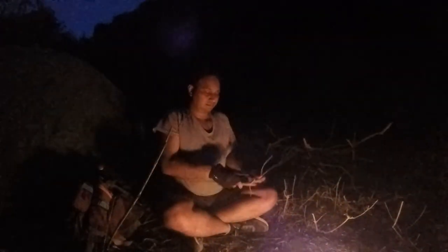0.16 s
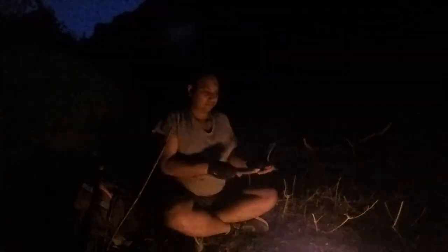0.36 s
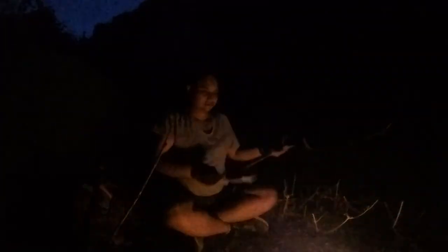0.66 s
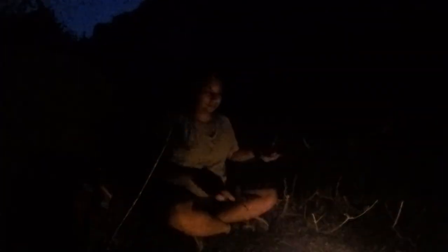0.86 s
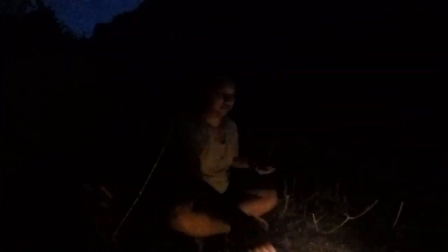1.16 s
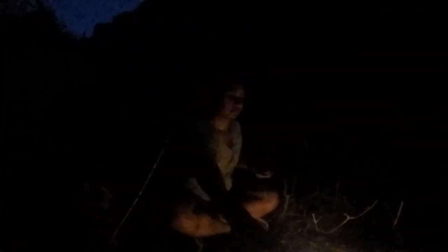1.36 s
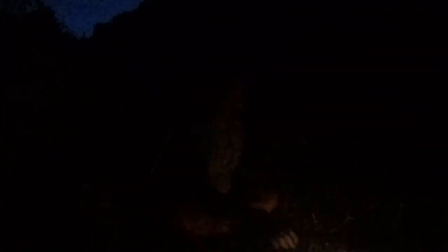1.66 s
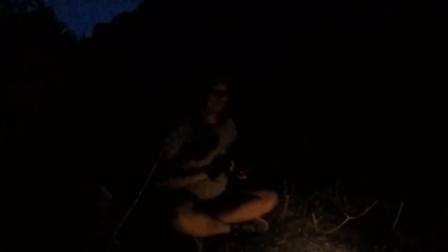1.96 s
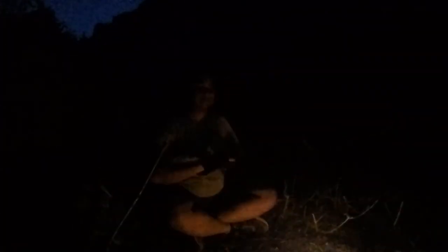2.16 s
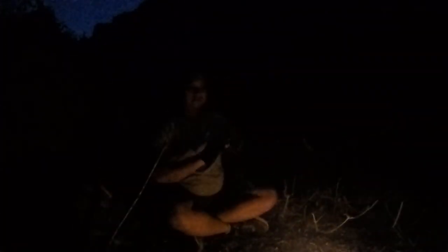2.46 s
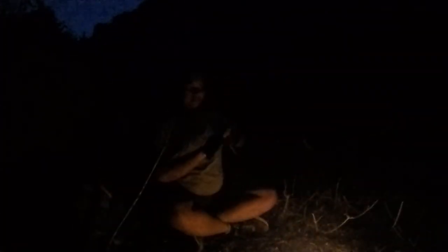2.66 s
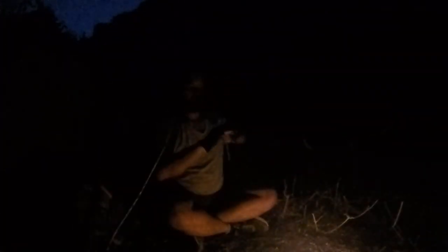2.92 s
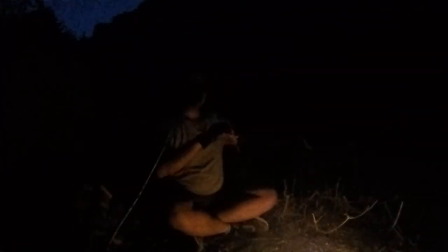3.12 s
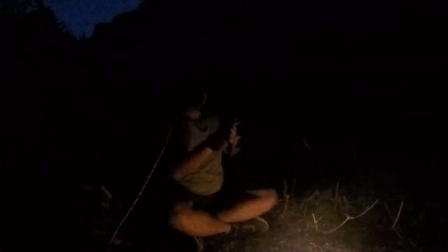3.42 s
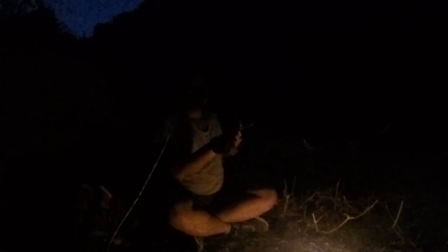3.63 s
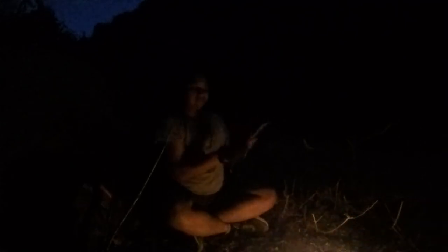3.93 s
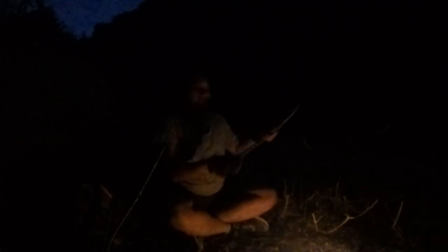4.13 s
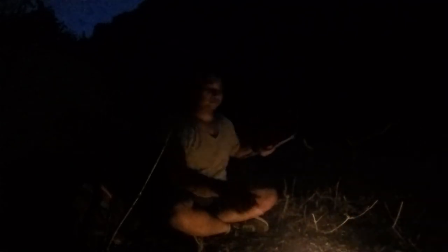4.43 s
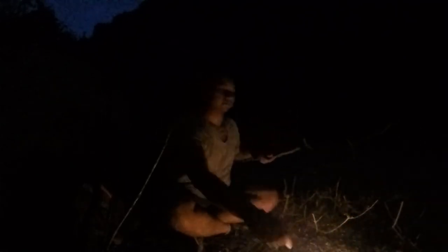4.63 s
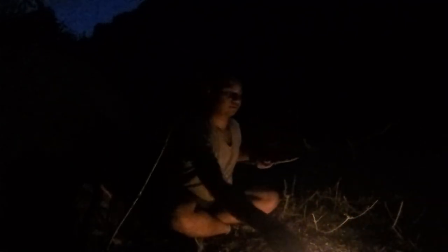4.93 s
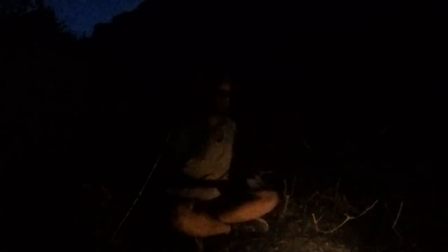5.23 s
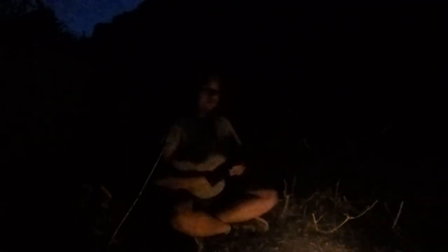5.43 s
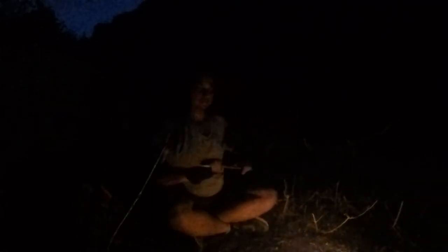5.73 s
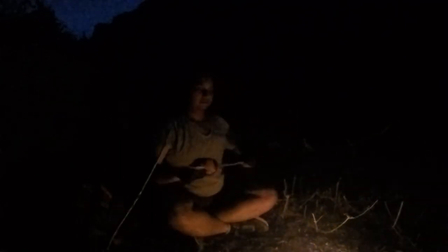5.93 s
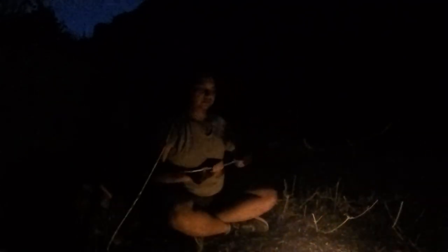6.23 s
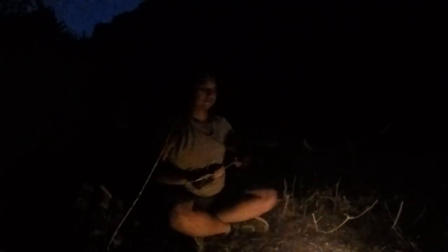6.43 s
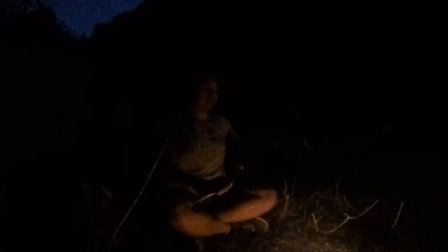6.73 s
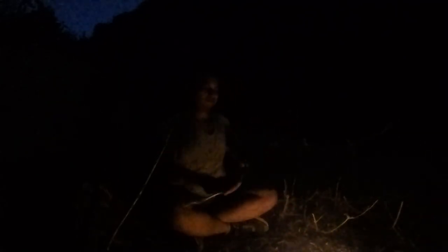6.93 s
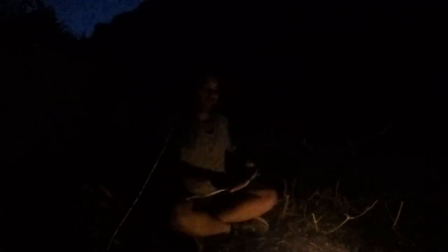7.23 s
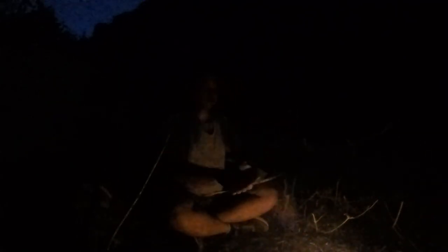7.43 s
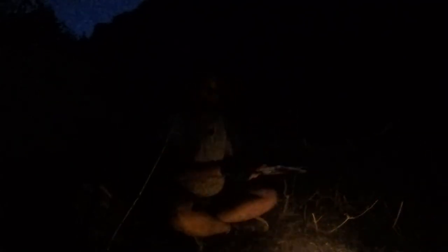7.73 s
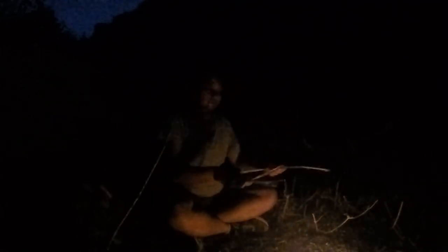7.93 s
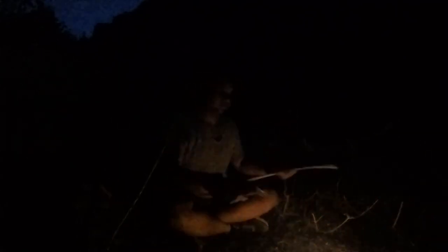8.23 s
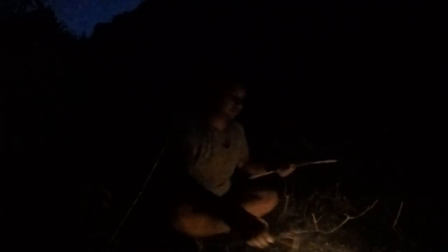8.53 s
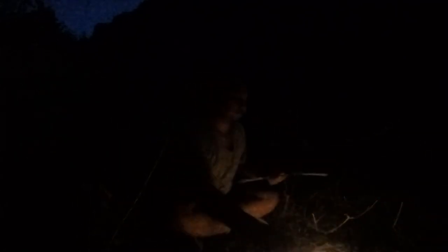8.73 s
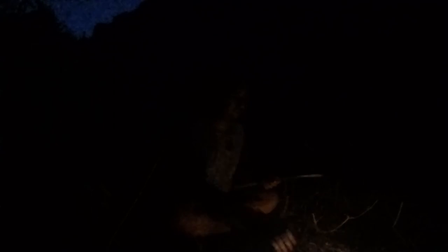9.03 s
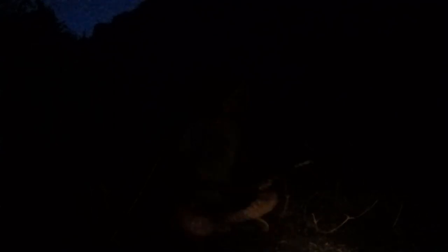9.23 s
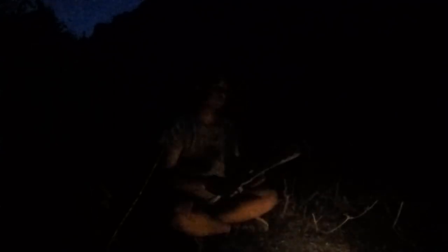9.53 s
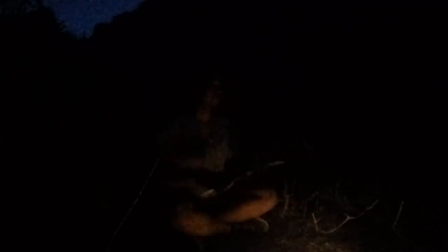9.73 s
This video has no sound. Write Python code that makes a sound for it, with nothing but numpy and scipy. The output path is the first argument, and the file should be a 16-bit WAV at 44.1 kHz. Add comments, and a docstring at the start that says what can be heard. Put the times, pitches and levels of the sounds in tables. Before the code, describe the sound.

Brittle twigs crack and splinter in bursts, the loudest past seven seconds, while crickets chirp and trill in quiet night air.

```python
"""Dry sticks are broken by hand at night, outdoors, a few metres from a small microphone.
Each crack is a burst of tearing-fibre noise with a brief ring and ground echoes; bark ticks and dull knocks join it.
Around them, one cricket chirps and one trills as rasped sine strokes, above a throbbing noise band of far crickets.
Air and wind are shaped noise. Loud cracks turn the gain down, so the night ducks and swells back."""
import sys
import numpy as np
from scipy import signal
from scipy.fft import rfft, irfft, next_fast_len
from scipy.io import wavfile
from scipy.ndimage import uniform_filter1d, minimum_filter1d

SR = 44100
rng = np.random.default_rng(int(sys.argv[2]) if len(sys.argv) > 2 else 0)


def store_wav(level_fs):
    """Save 16-bit WAV to argv[1]."""
    pcm = np.round(np.clip(np.atleast_2d(level_fs), -1, 1) * 32767)
    wavfile.write(sys.argv[1], SR, pcm.T.astype(np.int16))


N = 435266
TIME = np.arange(N) / SR


def undb(db):
    """Decibels to gain."""
    return 10 ** (np.asarray(db) / 20)


def unit(x):
    """Scale to rms 1."""
    return x / np.sqrt(np.mean(x ** 2) + 1e-20)


def curve(rows):
    """The second column of a table over its first, joined by straight lines in time."""
    seconds, values = np.transpose(rows)
    return np.interp(TIME, seconds, values)


def shape(points, size):
    """Gain in dB at the bins of a transform, joined by straight lines over log frequency."""
    hz, db = np.transpose(points)
    bins = np.maximum(np.arange(size // 2 + 1) * SR / size, 1)
    return np.interp(np.log(bins), np.log(hz), db)


def colour(x, points):
    """Give a long sound a spectrum, at rms 1."""
    size = next_fast_len(N, True)
    spectrum = rfft(x, size) * undb(shape(points, size))
    return unit(irfft(spectrum, size)[:N])


def strike(x, db):
    """Filter a short sound with minimum phase, so that nothing comes before its attack."""
    cepstrum = irfft(np.log(undb(db)))
    # fold the backward half of the cepstrum onto the forward half
    cepstrum[1:len(x) // 2] *= 2
    cepstrum[len(x) // 2 + 1:] = 0
    return irfft(rfft(x) * np.exp(rfft(cepstrum)))


def walk(rate):
    """Smooth random wandering with an rms of 1, from `rate` random knots per second."""
    knots = rng.standard_normal(int(N / SR * rate) + 2)
    wander = np.interp(TIME * rate, np.arange(len(knots)), knots)
    return unit(uniform_filter1d(wander, int(SR / rate / 2) + 1))


def add(out, s, x):
    """Mix a sound in at a time in seconds."""
    start = max(int(s * SR), 0)
    out[start:start + len(x)] += x[:max(N - start, 0)]


def night(chorus_db=-46.0, air_db=-47, throb=0.19, throb_hz=18.6):
    """Many far crickets merge into a throbbing band above the soft rush of the air."""
    # Slow drift of chorus and air together. Each row: time in seconds, level in dB.
    drift_rows = [(0, 1), (0.4, -3), (1.2, 0), (3.0, 1), (3.25, -2.5), (4.1, 1), (6.2, 1), (6.65, -1),
                  (7.6, -2.5), (8.75, -3), (9.3, 0), (9.87, 0.5)]
    # Spectrum of the air. Each row: frequency in Hz, relative density in dB per Hz.
    air_spectrum = [(60, -1), (150, 2), (350, -0.5), (700, -4.5), (1100, -7), (2000, -9), (3500, -12.5),
                    (6000, -14.5), (9000, -17.5), (12000, -20), (15000, -24)]
    # Spectrum of the far crickets. Each row: frequency in Hz, relative density in dB per Hz.
    chorus_spectrum = [(3700, -37), (4020, -15.5), (4150, -2), (4280, -9.5), (4650, 2.5), (5030, 3.5),
                       (5200, -2.5), (5380, -26), (6300, -17), (6700, -10.5), (7200, -26), (8000, -24.5)]
    wandering_hz = throb_hz * (1 + 0.027 * walk(2.13))
    pulse = 1 + throb * np.sin(2 * np.pi * np.cumsum(wandering_hz) / SR)
    chorus = colour(rng.standard_normal(N), chorus_spectrum) * pulse * undb(0.69 * walk(90))
    air = colour(rng.standard_normal(N), air_spectrum) * undb(0.79 * walk(19))
    return (chorus * undb(chorus_db) + air * undb(air_db)) * undb(curve(drift_rows))


def wind(sway_db=-15, buffet_db=-36.5, sway_share=0.44, eddy_db=0.5, lull_db=2):
    """Large eddies sway the air at the microphone port; small ones buffet it and grow faster with the wind."""
    # Wind strength at the microphone. Each row: time in seconds, strength in dB re a moderate breeze.
    strength_rows = [(0, 22), (0.5, 1.5), (0.72, 12.5), (0.95, 13.5), (1.03, -6.5), (1.48, 5), (1.7, -11),
                     (2.15, -1), (2.6, -2), (2.8, 3.5), (3.65, 11.5), (3.95, -1), (4.7, -14.5), (6.0, 0),
                     (6.7, 3), (7.3, 6.5), (7.42, -3), (7.8, -11), (7.97, 5.5), (8.3, 0.5), (8.9, -5),
                     (9.1, -17), (9.87, -1)]
    # Spectrum of the large eddies. Each row: frequency in Hz, relative density in dB per Hz.
    sway_spectrum = [(6, -2), (12, 4), (20, 3.5), (28, -4), (36, -6), (48, -15), (65, -31.5), (100, -38.5),
                     (200, -75)]
    # Spectrum of the small eddies. Each row: frequency in Hz, relative density in dB per Hz.
    buffet_spectrum = [(30, -8), (50, -11.5), (62, 2), (80, -7), (100, -14), (130, -22.5), (180, -34.5),
                       (300, -52.5), (600, -94)]
    strength_db = curve(strength_rows)
    surge_db = lull_db * walk(9)
    sway = colour(rng.standard_normal(N), sway_spectrum) * undb(sway_db + sway_share * strength_db)
    buffet_level_db = buffet_db + strength_db + eddy_db * walk(14)
    buffet = colour(rng.standard_normal(N), buffet_spectrum) * undb(buffet_level_db)
    return (sway + buffet) * undb(surge_db)


def wing_stroke(hz, length_s, fall, rasp, tooth_hz, size=2048):
    """A file drawn over the wing: a falling tone, roughened by the teeth."""
    t = np.arange(size) / SR
    stroke = np.minimum(t / length_s, 1)
    falling_hz = hz * (1 + fall * (.5 - stroke))
    phase = 2 * np.pi * np.cumsum(falling_hz) / SR
    teeth = 1 + rasp * np.cos(2 * np.pi * (tooth_hz * t + rng.random()))
    return np.sin(np.pi * stroke) * teeth * np.sin(phase)


def trilling_cricket(hz=5580, rate=18.2, gap_s=0.015, gain_db=7, swell_db_per_s=1.5, detune=0.0028):
    """Pairs of nearly pure strokes in a fast, even train that swells until the bout breaks off."""
    # Bouts. Each row: start in seconds, end in seconds, level at the end in dB before gain_db.
    bouts = [(0.564, 2.7, -51.5), (2.664, 4.8, -53), (7.957, 8.5, -55)]
    out = np.zeros(N)
    for start_s, end_s, db in bouts:
        for s in np.arange(start_s, end_s, 1 / rate):
            level_db = db + gain_db - swell_db_per_s * (end_s - s)
            for lag_s in (0, gap_s):
                late, sharp = rng.standard_normal(2)
                stroke = wing_stroke(hz * (1 + detune * sharp), 0.01, fall=0.017, rasp=.15, tooth_hz=300)
                add(out, s + lag_s + 0.0011 * late, undb(level_db) * stroke)
    return out


def near_cricket(hz=7020, period_s=0.115, gain_db=5.0, lead_db=-4, gap_s=.017, length_s=0.014,
                 jitter_s=0.0035, scatter_db=3.5):
    """Chirps at a nearly even pace within a bout; each is a soft opening stroke and a stronger closing one."""
    # Bouts. Each row: first chirp in seconds, last chirp in seconds, level in dB before gain_db.
    bouts = [(0.532, 0.859, -53), (1.05, 1.164, -50), (1.544, 2.354, -49), (2.726, 3.292, -51),
             (3.497, 3.72, -52), (4.036, 4.263, -49), (4.474, 5.734, -48), (5.952, 6.656, -48.5),
             (7.907, 8.26, -53), (8.525, 8.87, -53.5), (9.27, 9.832, -48.5)]
    out = np.zeros(N)
    for first_s, last_s, db in bouts:
        count = round((last_s - first_s) / period_s) + 1
        for s in np.linspace(first_s, last_s, count):
            late, loud = rng.standard_normal(2)
            for lead_s, stroke_db in [(gap_s, lead_db), (0, 0)]:
                stroke_hz = hz * (1 + .008 * rng.standard_normal())
                stroke = wing_stroke(stroke_hz, length_s, fall=0.045, rasp=0.88, tooth_hz=318)
                start_s = s + jitter_s * late - lead_s - length_s / 2
                add(out, start_s, undb(db + stroke_db + gain_db + scatter_db * loud) * stroke)
    return out


def thuds(decay_s=0.009, size=4096):
    """Dull knocks of hands and wood that the palms or the soil damp at once."""
    # Knocks. Each row: start in seconds, peak in dB, centre frequency in Hz.
    knocks = [(0.203, -37, 460), (1.301, -33, 400), (1.346, -34.5, 300), (3.9, -26, 333), (3.93, -31, 330),
              (4.061, -32, 256), (4.211, -28, 235), (4.928, -33, 450), (7.299, -14, 96), (8.941, -37, 387),
              (9.21, -35, 189)]
    out, t = np.zeros(N), np.arange(size) / SR
    for s, db, hz in knocks:
        push = rng.standard_normal(size) * np.exp(-t / decay_s)
        thud = strike(push, shape([(hz / 3, -18), (hz, 0), (2 * hz, -8), (10 * hz, -40)], size))
        add(out, s, undb(db) * thud / np.abs(thud).max())
    return out


def crackle(seconds, coarse_db, rate, spread_db, release_s=0.016, tick_s=0.00081, smear_s=0.0075,
            smear_db=-17, fibre_hz=8000, fibre_db=7, size=512):
    """Bark ticks of unequal size, each with its own resonance and scattered tail; coarse bark has more body."""
    # Spectrum of bark. Each row: frequency in Hz, gain in dB.
    bark_spectrum = [(300, -17.5), (900, -5.5), (2000, 5.5), (3300, 4), (5000, 1.5), (7000, -3),
                     (11000, 2.5), (15000, -7.5)]
    n = next_fast_len((int((seconds + 5 * release_s) * SR) + 8 * size) // 2, True) * 2
    span_s = seconds + 4 * release_s
    count = int(rate * span_s) + 1
    place, strength, pitch = rng.random((count, 3)).T
    at_s = (np.arange(count) + place) / count * span_s
    # the pressure builds quickly, holds, and lets go gradually
    build = np.minimum(at_s / (0.17 * seconds), 1)
    pressure = build * np.exp(-np.maximum(at_s - 0.9 * seconds, 0) / release_s)
    sizes = pressure * undb(spread_db * np.minimum(-np.log(1 - strength), 3.5))
    t = np.arange(size) / SR
    decay = np.exp(-t / tick_s) + undb(smear_db) * np.exp(-t / smear_s)
    ticks = rng.standard_normal((count, size)) * decay
    # each tick resonates within an octave of fibre_hz
    hz = np.arange(size + 1) * SR / (2 * size)
    centre_hz = fibre_hz * 2 ** (2 * pitch[:, None] - 1)
    resonance = 1 + undb(fibre_db) / (1 + 1j * (hz / centre_hz - 1) / 0.11)
    ticks = irfft(rfft(ticks, 2 * size) * resonance)
    # overlap all ticks at their own times
    positions = (at_s * SR).astype(int)[:, None] + np.arange(2 * size)
    grains = np.bincount(positions.ravel(), (sizes[:, None] * ticks).ravel(), n)
    sound = strike(grains, shape(bark_spectrum, n) + shape([(2500, coarse_db), (9000, 0)], n))
    return sound / (np.linalg.norm(sound) + 1e-9) * np.sqrt(seconds * SR)


def handling(rub_db=0.5, rate=600, spread_db=5.0, grip_db=2.1, idle_db=-59):
    """Bark catches and slips in short scrapes; sparse faint ticks while twigs are sorted."""
    # Rubbing bark and splinters. Each row: start in seconds, length in seconds,
    # level in dB before rub_db and the grip, coarseness as low-end gain in dB.
    scrapes = [(0.005, 0.24, -42.5, -12), (0.214, 0.07, -35.5, -7), (0.412, 0.025, -38.5, -6),
               (0.438, 0.07, -37, 2), (1.521, 0.047, -43.5, 2.5), (1.77, 0.023, -48, 20),
               (2.211, 0.93, -55, -4), (3.725, 0.03, -21.5, -4), (3.771, 0.063, -35, -7),
               (3.853, 0.11, -42.5, 6), (4.012, 0.078, -47, -15), (4.45, 0.37, -62, -4),
               (5.396, 0.36, -56, -8), (5.923, 0.25, -48.5, 1), (6.607, 0.16, -48.5, -7),
               (6.728, 0.03, -34, -11), (6.778, 0.038, -35.5, -16), (6.856, 0.032, -32, -12),
               (6.916, 0.051, -33.5, -14), (7.001, 0.22, -45, -4), (7.288, 0.012, -32, -4),
               (7.298, 0.023, -14, -5), (7.351, 0.032, -36, -3), (7.439, 0.11, -35, -4),
               (7.552, 0.11, -41, -4), (7.675, 0.075, -35.5, -1), (7.788, 0.044, -31, -8),
               (7.911, 0.12, -41, -17), (8.11, 0.067, -46, -8), (8.441, 0.12, -51, 4),
               (9.519, 0.11, -52.5, 18), (9.76, 0.2, -44.5, -3)]
    out = np.zeros(N)
    for s, seconds, db, coarse_db in scrapes:
        add(out, s, undb(db + rub_db) * crackle(seconds, coarse_db, rate, spread_db))
    twigs = crackle(N / SR, coarse_db=3.5, rate=45, spread_db=2.0)[:N]
    grip = undb(grip_db * walk(110))
    return out * grip + undb(idle_db) * twigs


def disperse(x, lag_ms=0.38, at_hz=5000):
    """Bending waves in a stick travel faster the higher they are, which smears each click."""
    hz = np.arange(len(x) // 2 + 1) * SR / len(x)
    # the delay is lag_ms at at_hz and falls with the root of frequency
    return irfft(rfft(x) * np.exp(-4j * np.pi * lag_ms / 1000 * np.sqrt(hz * at_hz)))


def crack(tear_ms, body_db, bright_db, ring_hz, first=2.26, spread_db=4, tail_db=-14, tail_s=0.0068,
          ring_db=6, ring_width=0.089, size=4096):
    """The first fibre pulls the rest after it; the piece rings briefly and the ground scatters the sound."""
    # Spectrum of breaking wood. Each row: frequency in Hz, gain in dB.
    wood_spectrum = [(100, -1.5), (300, -16), (820, -10.5), (1460, -4), (2600, -3.5), (3300, -5.5),
                     (4300, 2.5), (5150, 5), (6600, -3), (9000, -5), (11400, 0), (13000, -8.5),
                     (14200, -3.5), (15500, -16)]
    # Echoes off the ground and nearby rock. Each row: mean delay in ms, level in dB.
    echoes = [(1.3, -16.5), (8.501, -19.5)]
    t = np.arange(size) / SR
    fibres = rng.standard_normal(size) * undb(spread_db * rng.exponential(size=size))
    tearing = fibres * np.exp(-(t / (max(tear_ms, .1) / 1000 * 2.01)) ** 2)
    tearing /= np.linalg.norm(tearing)
    tearing[0] += first / (1 + 2 * tear_ms)  # quick breaks start with a sharper click
    force = tearing.copy()
    for delay_ms, db in echoes:
        path_ms = delay_ms * (1 + 0.18 * rng.standard_normal())  # the hands are never in the same place
        delay_s = round(path_ms / 1000 * SR) / SR
        force += undb(db) * np.interp(t - delay_s, t, tearing, left=0)
    scatter = rng.standard_normal(size) * np.exp(-t / tail_s) * (1 - np.exp(-t * 1000))
    force += undb(tail_db) * scatter * np.linalg.norm(force) / np.linalg.norm(scatter)
    # thick pieces have more body, thin splinters more treble; each has a few bending modes
    tilt = shape([(1200, body_db), (2300, 0), (6000, 0), (8500, bright_db)], size)
    hz = np.arange(size // 2 + 1) * SR / size
    modes = np.zeros(len(hz))
    for ratio, gain in [(.6, 0.087), (1, 1), (1.75, 0.55), (2.76, 0.11)]:
        modes += gain / (1 + ((hz / (ring_hz * ratio) - 1) / ring_width) ** 2)
    sound = disperse(strike(force, shape(wood_spectrum, size) + tilt + ring_db * modes))
    return sound / np.linalg.norm(sound) * np.sqrt(SR / 100)  # rms 1 if spread over 10 ms


def sticks():
    """All the cracks, from splinter ticks to full breaks, each a burst of fibre noise."""
    # Cracks. Each row: start in seconds, level in dB over 10 ms, tearing time scale in ms (stretched in crack),
    # body in dB, brightness in dB, ring of the piece in Hz.
    breaks = [(0.0211, -14.5, 0.65, -2, 9, 2480), (0.0514, -12.5, 0.18, -21, 7.5, 2030),
              (0.1807, -14, 0.42, 13, 12, 2080), (0.2014, -9.5, 1.8, 7, 15.5, 1850),
              (0.2296, -27, 2.1, -12, 6, 1720), (0.2427, -19.5, 0.55, -9, 7, 1880),
              (0.273, -24.5, 1.5, -24, 1, 1990), (0.3266, -27.5, 1.8, 6, 7, 2530),
              (0.4543, -28.5, 5.9, 9, 6, 2510), (0.504, -33, 4.3, 9, 9, 1860),
              (0.7407, -42, 1.8, -11, 12, 1570), (0.832, -35.5, 2.2, 10, 12.5, 1460),
              (1.3001, -34.5, 0.25, 12.5, 1, 1900), (2.531, -30.5, 7, -1, 3.5, 2470),
              (2.7, -36.5, 0.76, -15, 2, 1210), (3.286, -37, 1.6, 5, 13, 1720),
              (3.3443, -11, 1.4, 3.5, 7.5, 1660), (3.404, -14.5, 0.75, -8, 17, 1490),
              (3.407, -10, 1.24, 2.5, 10, 2090), (3.7241, -8.5, 1.75, 7, -4.5, 1780),
              (3.75, -11, 5.3, -3, 13, 2420), (3.771, -17, 0.22, 13, 14, 1810),
              (3.816, -20.5, 0.52, 12, 10, 1380), (3.8319, -13.5, 0.21, 3.5, 9, 1730),
              (3.8643, -26.5, 0.7, 11, 5, 1120), (3.9005, -28, 0.83, 14, 11, 1060),
              (3.9269, -23, 2.9, 5.5, 0, 1090), (4.026, -34, 2.1, 6, 8, 1590),
              (4.452, -35.5, 1.4, 4, 7, 1540), (4.8649, -37.5, 0.25, 12, 6, 2130),
              (4.9373, -30, 1.4, 4, -4, 2120), (5.2791, -36, 1.3, 6, -8, 2100),
              (5.3986, -37.5, 0.34, -18, 3, 1060), (5.533, -32, 0.34, 16, 1, 1790),
              (6.2804, -33.5, 0.2, 3, 3.5, 2070), (6.586, -39, 0.37, 3, 22, 1830),
              (6.7482, -23.5, 0.54, 0, -2, 2470), (6.7621, -10.5, 1.8, -25, -1.5, 2530),
              (6.8634, -29.5, 0.31, -11, -10, 2780), (6.951, -25, 1.4, -13, 23, 970),
              (6.987, -0.5, 1.7, 1.5, 6.5, 2420), (7.047, -22.5, 0.8, -17, 10, 2750),
              (7.1363, -17, 2.4, -4, 8, 2880), (7.16, -26.5, 1, 8, 6, 1740),
              (7.2077, -9, 0.82, 2.5, 9.5, 2520), (7.2662, -29, 1.2, -16, 3, 2000),
              (7.299, 4.5, 1.25, 0, 3, 1260), (7.371, -26, 1.6, 9, -2, 1610),
              (7.4452, -21.5, 3.8, -1, 12, 2520), (7.6166, -28.5, 3.2, -3, 5.5, 1800),
              (7.71, -29, 8.2, 3, 4, 2690), (7.8108, -25, 2.3, -2.5, 1, 2650),
              (7.885, -24.5, 0.71, -6, 10, 1850), (7.9541, -24.5, 2.5, -13, 21, 2950),
              (7.995, -32.5, 0.4, -8, 15, 2700), (8.1614, -25.5, 1.3, 13, 15.5, 1790),
              (8.168, -31, 0.29, 10, 13, 2450), (8.294, -38.5, 0.21, -11, 3, 2370),
              (8.95, -40, 3.1, 8, 0, 1820), (9.7506, -27.5, 1.2, 5, 4, 2330)]
    out = np.zeros(N)
    for s, db, tear_ms, body_db, bright_db, ring_hz in breaks:
        add(out, s, undb(db) * crack(tear_ms, body_db, bright_db, ring_hz))
    return out


def outdoors(x, wet_db=-31, t60=0.43, size=16384):
    """Faint, short return from brush and rocks: a decaying noise tail that starts after 10 ms."""
    t = np.arange(size) / SR
    tail = rng.standard_normal(size) * undb(-60 * t / t60) * (t > .01)
    return x + undb(wet_db) * signal.fftconvolve(x, tail / np.linalg.norm(tail))[:N]


def follow(x, start, attack_s, release_s, step_s):
    """Track a control with one time constant for rising and another for falling."""
    out, y = [], start
    for value in x:
        time_s = attack_s if value > y else release_s
        y += (value - y) * (1 - np.exp(-step_s / time_s))
        out.append(y)
    return out


def gain_control(x, threshold_db=-13.5, slope=0.49, attack_s=0.021, hold_s=.13, release_s=0.3,
                 start_db=11, size=64):
    """Loud cracks turn the gain down; it holds, then creeps back. It starts turned down and ignores the rumble."""
    heard = signal.sosfilt(signal.butter(4, 300, "highpass", fs=SR, output="sos"), x)
    power = np.abs(uniform_filter1d(heard ** 2, SR // 100)[::size])  # 10 ms average
    level_db = 10 * np.log10(power + 1e-12)
    # the loudest level of the last hold_s
    half = int(hold_s * SR / size / 2)
    held_db = -minimum_filter1d(-level_db, 2 * half + 1, origin=half)
    excess_db = np.maximum(held_db - threshold_db, 0)
    cut_db = follow(slope * excess_db, start_db, attack_s, release_s, size / SR)
    return x * undb(-np.interp(TIME - .005, TIME[::size], cut_db))  # the cut acts 5 ms late


def scene():
    """Sticks in front, insects around, wind at the microphone."""
    by_hand = outdoors(sticks() + handling() + thuds())
    insects = near_cricket() + trilling_cricket()
    return (by_hand + insects + night() + wind())[None]


def record(dry, ceiling=0.9, top_hz=15550):
    """The gain ducks after loud cracks, the highest peaks are flattened, and the top is cut."""
    ducked = gain_control(dry[0])[None]
    flattened = ducked / (1 + (ducked / ceiling) ** 6) ** (1 / 6)
    return signal.sosfilt(signal.ellip(10, .2, 90, top_hz, fs=SR, output="sos"), flattened)


dry = scene()
out = record(dry)
store_wav(out)
```